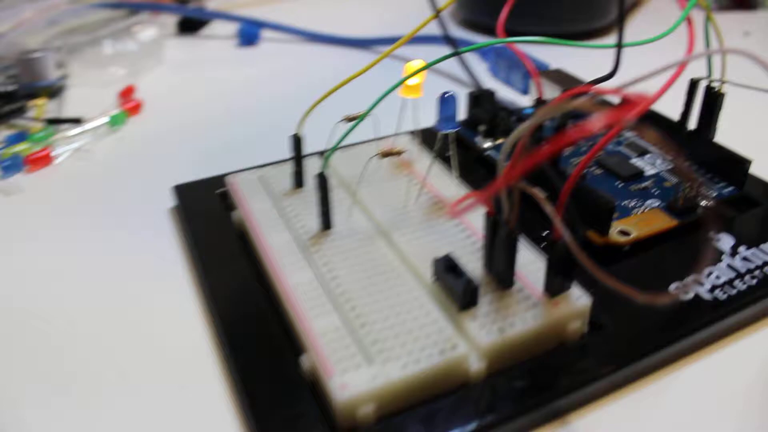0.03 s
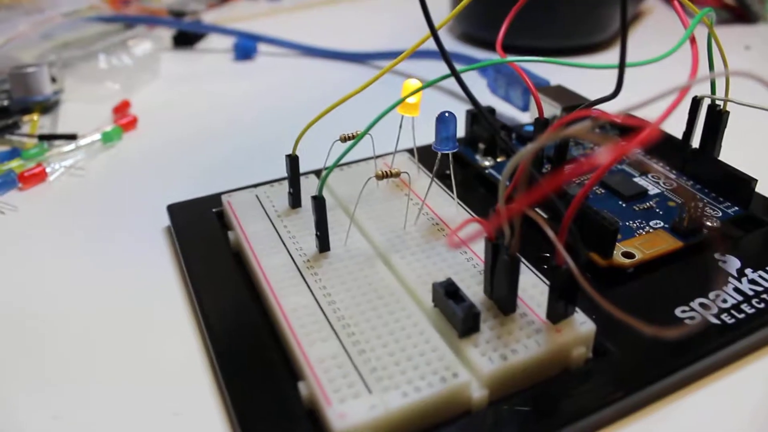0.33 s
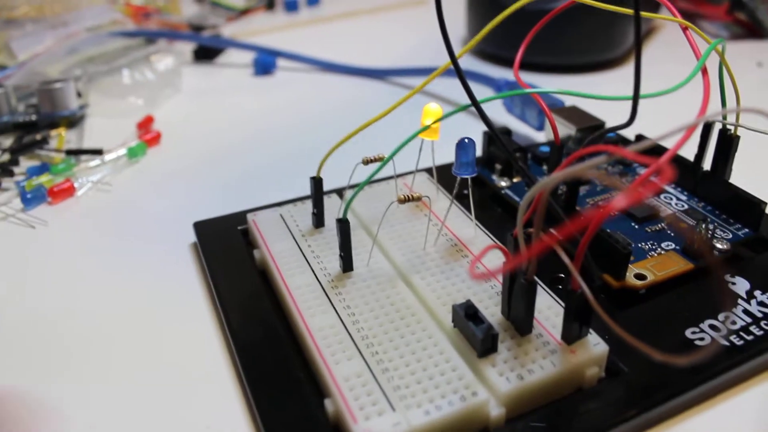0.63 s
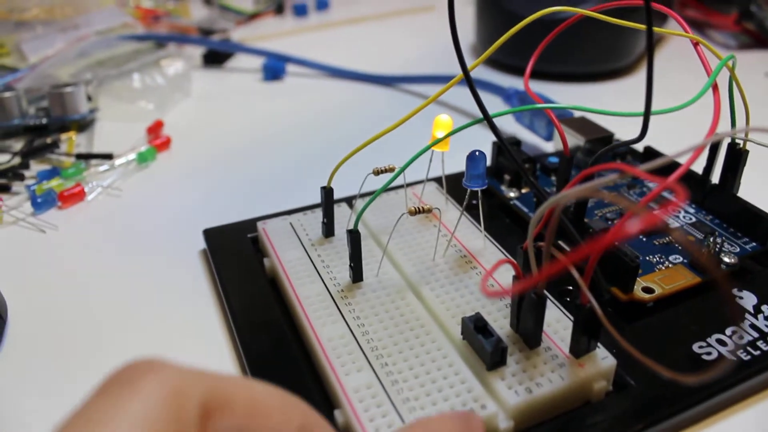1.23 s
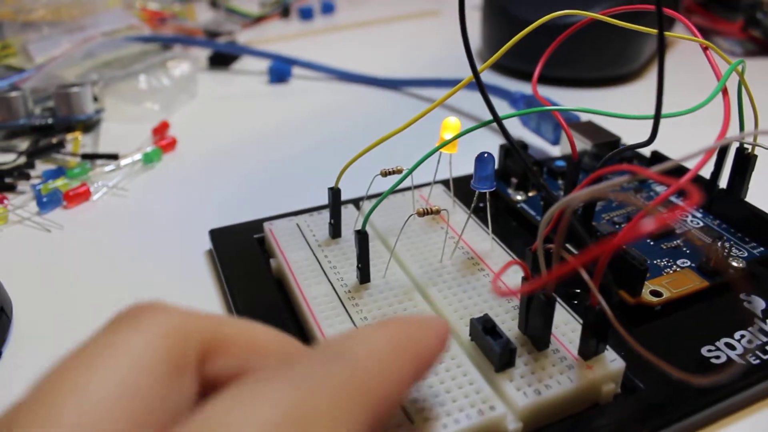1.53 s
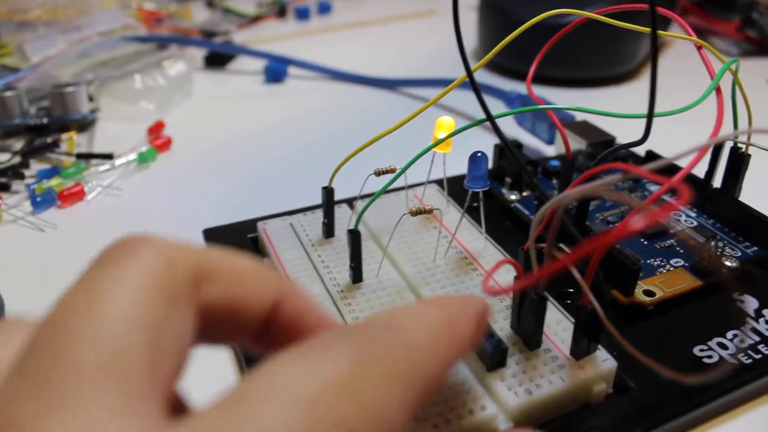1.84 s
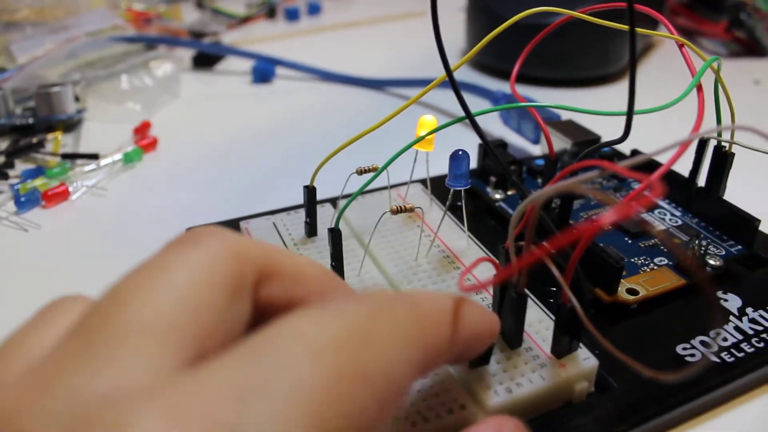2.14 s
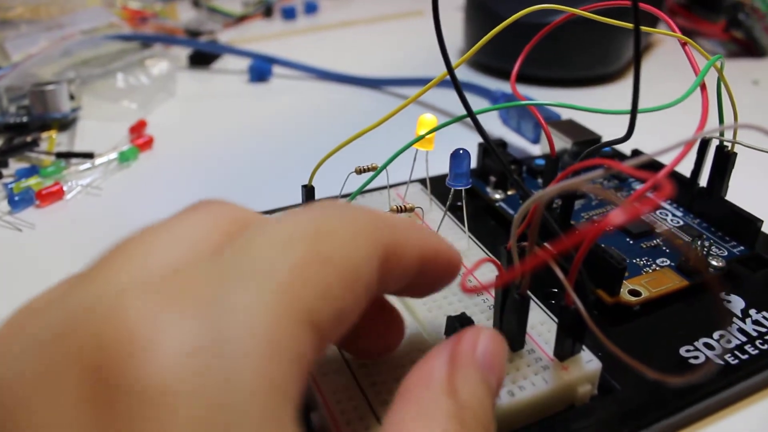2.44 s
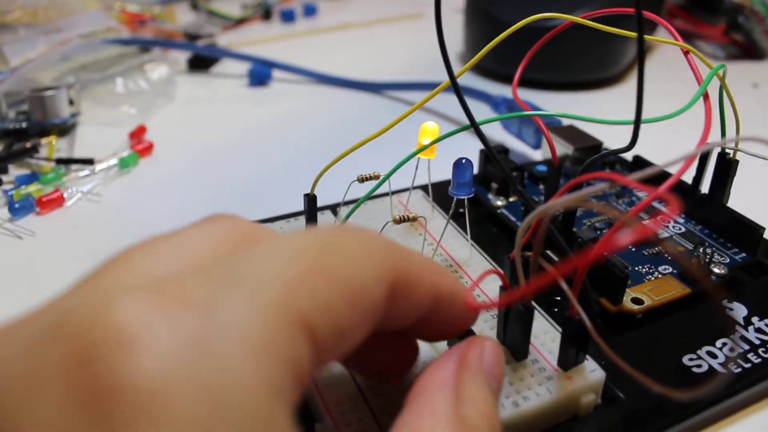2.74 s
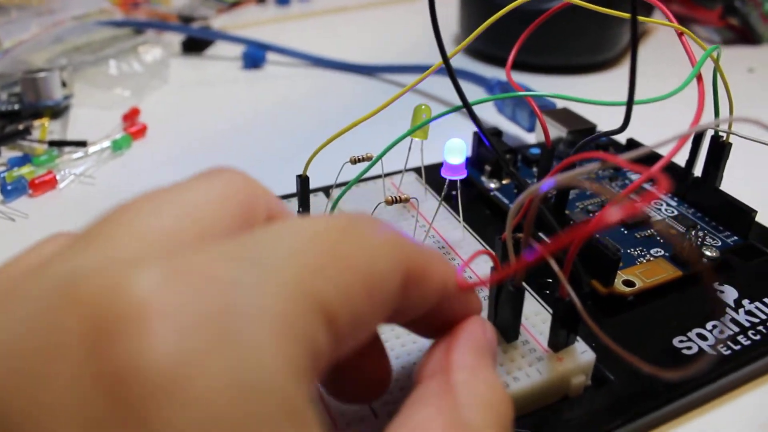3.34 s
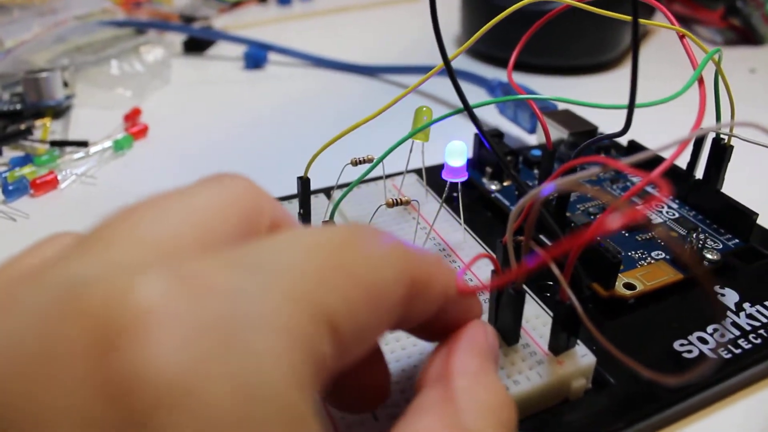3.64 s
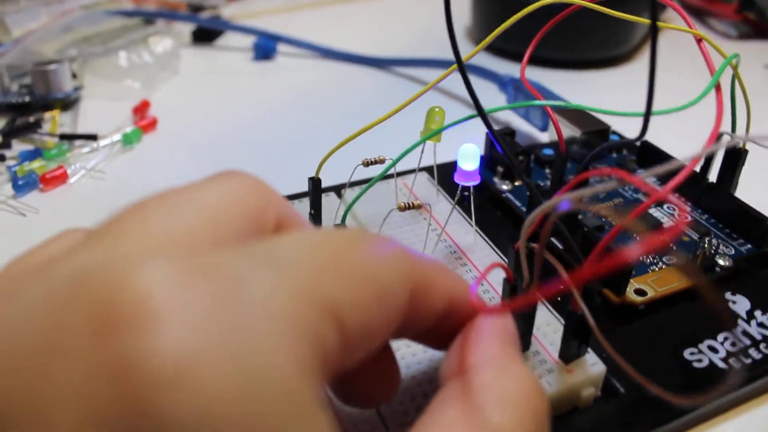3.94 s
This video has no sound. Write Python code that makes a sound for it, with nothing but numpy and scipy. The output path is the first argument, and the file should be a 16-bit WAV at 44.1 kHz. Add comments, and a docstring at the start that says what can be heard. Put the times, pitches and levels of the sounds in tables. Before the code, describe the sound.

A small slide switch snaps over with one sharp, close click at about 3.2 seconds, lightly knocking its plastic board and the desk. Earlier, a hand rustles and crackles on the microphone until 0.4 seconds. Faint finger taps, lens ticks and a very faint motor whine follow, with a fingernail tick at 2.3 seconds. Soft ventilation hiss and hum fill the quiet room throughout.

```python
"""In a quiet room, a small slide switch on a breadboard snaps over, close to a hand-held camera.
Ventilation hisses and hums. First the hand rustles and crackles as skin sticks and slips on the camera;
later the camera ticks faintly and its lens motor whines. Fingers tap on plastic and a nail touches the
switch. Then the slider jumps out of its notch and hits its stop, knocking the board and the desk."""
import sys
import numpy as np
from scipy import signal
from scipy.fft import rfft, irfft
from scipy.io import wavfile

SR = 44100
rng = np.random.default_rng(int(sys.argv[2]) if len(sys.argv) > 2 else 0)


def digitize_waveform(pressure):
    """Quantize a signal to 16-bit integers and store it at the path in sys.argv[1].

    Rows of a 2-D input are taken as channels; values are limited to [-1, 1].
    """
    field = np.atleast_2d(pressure).T
    bounded = np.clip(field, -1, 1)
    quanta = np.round(bounded * 32767).astype(np.int16)
    wavfile.write(sys.argv[1], SR, quanta)


N = 176400
TIME = np.arange(N) / SR


def amp(db):
    """Turns decibels into a number to multiply by."""
    return 10 ** (np.asarray(db) / 20)


def unit(x):
    """Scales a sound to an average (rms) level of 1."""
    return x / np.sqrt(np.mean(x ** 2) + 1e-20)


def fade(t, fade_s):
    """Dies away by 60 dB in fade_s seconds."""
    return np.exp(-np.log(1000) * t / fade_s)


def look_up(table, hz):
    """Reads between the rows of a table, giving each octave equal space."""
    f, value = np.transpose(table)
    return np.interp(np.log(hz + 1), np.log(f + 1), value)


def add(mix, at, sound):
    """Mixes a sound in, starting at the given second."""
    part = mix[max(round(at * SR), 0):][:len(sound)]
    part += sound[:len(part)]


def colour(x, tone):
    """Gives x a tone (how strong each frequency is next to the others), at an average level of 1."""
    log_gain = np.log(amp(look_up(tone, abs(np.fft.fftfreq(len(x), 1 / SR)))))
    response = np.exp(np.conj(signal.hilbert(log_gain)))  # rings after a hit, never before
    return unit(irfft(rfft(x) * response[:len(x) // 2 + 1], len(x)))


def burst(tone, fade_s, rise_s=.00008):
    """One small hit: a puff of noise that dies away."""
    t = TIME[:4096]
    shape = fade(t, fade_s) * (1 - np.exp(-t / rise_s))
    noise = rng.standard_normal(len(t))
    for _ in range(4):  # even out chance peaks in the noise's tone
        phase = np.angle(rfft(noise * shape))
        noise = np.sign(irfft(np.exp(1j * phase)))
    return colour(noise * shape, tone) * np.sqrt(np.mean(shape ** 2))


def cracks(hits, tone, fade_s, above_hz=1000):
    """One burst for each hit, with its treble tilted up or down."""
    out = np.zeros(N)
    for at, db, tilt in hits:
        tilted = [(hz, level + tilt * np.log2(max(hz, above_hz) / above_hz)) for hz, level in tone]
        add(out, at, amp(db) * burst(tilted, fade_s))
    return out


def ring(notes, build_cycles=0.85):
    """A struck object rings with pure notes (f/Hz, level/dB, fade/s) that swell quickly and die away."""
    t = TIME[:SR // 2]
    out = np.zeros(len(t))
    for hz, db, fade_s in notes:
        swell = 1 - np.exp(-t * hz / build_cycles)
        out += amp(db) * swell * fade(t, fade_s) * np.sin(2 * np.pi * hz * t)
    return out


def wavering(hz, width_hz):
    """An unsteady note: noise narrowed to a thin band."""
    f = np.fft.rfftfreq(N, 1 / SR)
    return unit(irfft(rfft(rng.standard_normal(N)) / (1 + (2 * (f - hz) / width_hz) ** 2), N))


# Tone of the moving air: f/Hz, level/dB
AIR_TONE = [(12, -42), (20, -18), (49, -8), (91, -8.5), (123, -3.5), (198, -2.5), (301, -5.5), (446, -10),
            (1190, -15.5), (1960, -19.5), (4670, -23.5), (10800, -34.5), (16000, -49.5)]
# Low humming notes: f/Hz, level/dB
HUM_NOTES = [(59.5, -68), (126, -62)]
def ventilation():
    """Air rushes and hisses steadily, with a little hum."""
    air = amp(-51) * colour(rng.standard_normal(N), AIR_TONE)
    return air + sum(amp(db) * wavering(hz, width_hz=8.4) for hz, db in HUM_NOTES)


# How long the room's echo lasts: f/Hz, fade/s
ECHO_FADES = [(80, 0.37), (300, 0.53), (1000, 0.19), (3000, 0.18), (9000, 0.15)]
def room_echo(sound, build_s=0.013, top_hz=10000):
    """Sound bounces off the desk, then briefly around the room, and comes back duller."""
    t = TIME[:SR // 2]
    hz, times, bands = signal.stft(rng.standard_normal(len(t)), SR, nperseg=256)
    bands *= fade(times, look_up(ECHO_FADES, hz)[:, None])
    tail = signal.istft(bands, SR, nperseg=256)[1][:len(t)] * np.minimum(t / build_s, 1)
    desk = rng.standard_normal(len(t)) * fade(t, fade_s=0.025) * (t > .001)
    echo = amp(-11.5) * tail / np.linalg.norm(tail) + amp(-16) * desk / np.linalg.norm(desk)
    dull = signal.lfilter(*signal.butter(2, top_hz, fs=SR), sound)
    return signal.fftconvolve(dull, echo)[:N]


# Loudness of the lens motor: t/s, level/dB
WHINE_LEVELS = [(.55, -86), (.8, -69), (1.3, -69.5), (2.4, -77.5), (3.6, -69), (3.72, -77), (3.755, -63.5),
                (3.865, -59.5), (3.89, -66), (3.96, -78)]
def lens_motor(pitch_hz=2013, drift_hz=4):
    """A tiny motor whines on a slightly unsteady note, with a weaker one 1.5 times as high."""
    cycles = np.cumsum(pitch_hz + drift_hz * wavering(0, width_hz=42.4)) / SR
    whine = np.sin(2 * np.pi * cycles) + amp(-8.5) * np.sin(3 * np.pi * cycles)
    return amp(np.interp(TIME, *np.transpose(WHINE_LEVELS))) * unit(whine)


# Faint ticks in the lens: t/s, level/dB
LENS_TICKS = [(1.4972, -45), (1.5207, -44.5), (1.7295, -41.5), (2.024, -43.5), (2.4053, -48), (3.7869, -45)]
# Tone of a tick: f/Hz, level/dB
TICK_TONE = [(500, -20), (2800, 2), (4700, -10), (5500, 0), (7200, -7.5), (8900, -5.5), (11000, -24),
             (16000, -35)]
# Notes the lens rings with: f/Hz, level/dB, fade/s
LENS_NOTES = [(1640, -1.5, 0.049), (1998, 2.5, 0.041), (2844, -1, 0.034)]
def lens_ticks(ring_delay_s=0.00297):
    """The lens ticks, and rings a moment after each tick."""
    out = np.zeros(N)
    for at, db in LENS_TICKS:
        add(out, at, amp(db) * burst(TICK_TONE, fade_s=0.024, rise_s=0.0006))
        add(out, at + ring_delay_s, amp(db - 3) * ring(LENS_NOTES))
    return out


# Rubbing of the hand: t/s, low level/dB, middle level/dB, treble level/dB
RUB_LEVELS = [(.072, -52, -48, -61), (.082, -54, -39, -52), (.094, -48, -42.5, -51),
              (.116, -47, -43.5, -56), (.135, -48.5, -47.5, -47), (.158, -49, -48, -51),
              (.174, -76, -58, -63), (.192, -59, -48.5, -62), (0.221, -53, -41, -43), (.244, -62, -51, -50),
              (.260, -58, -51.5, -42), (.286, -63, -49.5, -45.5), (0.306, -55, -38, -35.5),
              (.318, -55, -48, -39), (.326, -53, -62, -66)]
# Tones of the low rub, the middle rub and the camera's bright shell: f/Hz, level/dB
LOW_TONE = [(100, -27), (350, -23), (560, 2.5), (800, -2.5), (1120, 4), (1450, -17), (2500, -49)]
MIDDLE_TONE = [(900, -28), (1450, -14), (1680, -1.5), (2200, -3), (2800, -1.5), (3350, 0.5), (4100, -8),
               (5500, -14.5), (9000, -63)]
SHELL_TONE = [(400, -30), (1350, -18.5), (1680, -5.5), (2200, -9.5), (3300, -5), (4400, -10.5), (5500, 1),
              (6200, -3.5), (7600, -16.5), (8600, -10), (9800, -15), (11000, -37), (13500, -34),
              (16000, -54)]
# Sharp slips of the hand: t/s, level/dB
SHARP_SLIPS = [(0.0746, -23.5), (0.0796, -27.5), (0.1534, -25), (0.2085, -33), (0.2145, -23.5),
               (.2210, -30), (.2250, -28), (0.2298, -27), (0.2323, -26), (0.2472, -36), (0.254, -27),
               (0.2606, -28), (0.2817, -31), (0.2922, -27.5), (0.2952, -29), (0.3012, -18.5),
               (0.3044, -17.5), (0.3106, -17), (0.314, -26), (0.3745, -35.5)]
# Light finger brushes and duller rubs: middle t/s, length/s, level/dB
LIGHT_BRUSHES = [(0.604, 0.029, -56.5), (.705, 0.03, -54.5), (1.081, 0.017, -51), (1.381, 0.045, -56),
                 (1.44, 0.045, -55.5), (3.992, 0.016, -56)]
DULL_RUBS = [(1.585, 0.03, -60.5), (1.66, 0.032, -56)]
# Tone of a light brush: f/Hz, level/dB
BRUSH_TONE = [(500, -9), (4700, -11), (5600, 3), (7200, -11), (8800, -14), (11000, -37)]
def hand_grip(slips_per_s=2600, spread_db=3):
    """Skin sticks and slips on the camera's shell: a rustle with sharp snaps, then soft strokes."""
    times, *levels = np.transpose(RUB_LEVELS)
    rubbing = (TIME > times[0]) * (TIME < times[-1])
    out = np.zeros(N)
    for db, tone in zip(levels, (LOW_TONE, MIDDLE_TONE, SHELL_TONE)):
        slips = rng.choice([-1, 1], N) * (rng.random(N) < slips_per_s / SR)
        sizes = amp(spread_db * np.minimum(rng.exponential(1, N), 4))
        out += colour(slips * sizes, tone) * amp(np.interp(TIME, times, db) + 0.5) * rubbing
    for at, db in SHARP_SLIPS:
        add(out, at, amp(db) * burst(SHELL_TONE, fade_s=0.0044))
    add(out, at=.1145, sound=ring([(560, -38.5, .075)]))  # hollow knock of the camera body
    for strokes, tone in ((LIGHT_BRUSHES, BRUSH_TONE), (DULL_RUBS, MIDDLE_TONE)):
        swells = sum(amp(db) * np.exp(-(2 * (TIME - at) / length) ** 2) for at, length, db in strokes)
        out += colour(rng.standard_normal(N), tone) * swells
    return out


# Light finger taps: t/s, level/dB
FINGER_TAPS = [(0.584, -44), (1.5765, -46), (2.8795, -43), (3.629, -45.5), (3.6464, -42.5), (3.9295, -45)]
# Tone of the tapped plastic: f/Hz, level/dB
TAP_TONE = [(300, -27), (1800, -8), (3000, 5), (4300, -12.5), (5600, -3), (16000, -38)]
def finger_taps():
    """A finger lands lightly on plastic, making a short click each time."""
    out = np.zeros(N)
    for at, db in FINGER_TAPS:
        add(out, at, amp(db) * burst(TAP_TONE, fade_s=.012))
    return out


# The nail meeting the switch: t/s, level/dB, treble tilt/(dB per octave)
NAIL_HITS = [(2.3280, -56, -5), (2.3307, -31, 2), (2.3325, -43, -4), (2.3344, -37, -3), (2.3395, -43, -5)]
# Tone of the nail's tick: f/Hz, level/dB
NAIL_TONE = [(800, -20), (1600, -12), (2900, -5.5), (4300, -10), (5000, 2.5), (5700, 7), (6400, -5),
             (7400, -7), (9500, -18), (11800, -8.5), (16000, -34)]
def fingernail():
    """A nail lands on the switch with a bright tick and a few duller bounces."""
    return cracks(NAIL_HITS, NAIL_TONE, fade_s=.010)


# The slider leaves its notch, hits the stop, bounces, settles: t/s, level/dB, treble tilt/(dB per octave)
SLIDER_HITS = [(3.2281, -10, 0), (3.2296, -2, 0), (3.2314, -5.5, -0.5), (3.2334, -10.5, 4),
               (3.2375, -15, -3), (3.2508, -25, -1), (3.2578, -21, -13), (3.2678, -22, -1)]
# Tone of the slider's crack: f/Hz, level/dB
CRACK_TONE = [(40, -29), (150, -16), (700, -7), (1170, -1), (1480, -11), (2000, -2), (2750, -1), (3300, -4),
              (4400, -7.5), (5600, -1), (6300, -7), (8500, -11), (9800, -11), (10800, -17), (12000, -15.5),
              (16000, -51)]
# Notes of the switch, breadboard and base plate: f/Hz, level/dB, fade/s
BOARD_NOTES = [(109, -13.5, 0.2), (195, -21, 0.2), (293, -11.5, 0.11), (633, -11.5, 0.14), (773, -15, 0.04),
               (1186, -1.5, 0.034), (1940, -1, 0.024), (2045, -6.5, 0.046), (2520, -7, 0.04),
               (2716, 2.5, 0.034), (2760, -19, 0.1), (5000, -15, .016), (5540, 1.5, .015),
               (9730, -9.5, 0.025)]
# Tone of the desk under the board: f/Hz, level/dB
DESK_TONE = [(50, -27), (95, 1.5), (150, -7.5), (290, -3.5), (370, -17.5), (900, -36.5)]
def slide_switch():
    """Each hit of the slider cracks; the hardest sets the board ringing and thuds into the desk."""
    out = amp(-16) * cracks(SLIDER_HITS, CRACK_TONE, fade_s=.009)
    add(out, at=3.2272, sound=ring([(800, -16, 0.0048)]))  # dull knock as the slider lets go
    hardest_s = max(SLIDER_HITS, key=lambda hit: hit[1])[0]
    add(out, hardest_s, amp(-22.5) * ring(BOARD_NOTES))
    add(out, hardest_s, amp(-32.5) * burst(DESK_TONE, fade_s=.11, rise_s=0.0051))
    return out


def scene():
    """Switch, nail and taps echo in the room; the camera's noises reach the one microphone directly."""
    clicks = slide_switch() + fingernail() + finger_taps()
    mono = clicks + room_echo(clicks) + hand_grip() + lens_motor() + lens_ticks() + ventilation()
    return np.array([mono, mono])


def record(dry, start_s=.072, top_hz=15800):
    """The microphone opens after a moment of silence and cuts off the very highest treble."""
    treble_cut = signal.firwin(401, top_hz, window=("kaiser", 9), fs=SR)
    return signal.oaconvolve(dry * (TIME > start_s), treble_cut[None], "same")


dry = scene()
out = record(dry)
digitize_waveform(out)
```